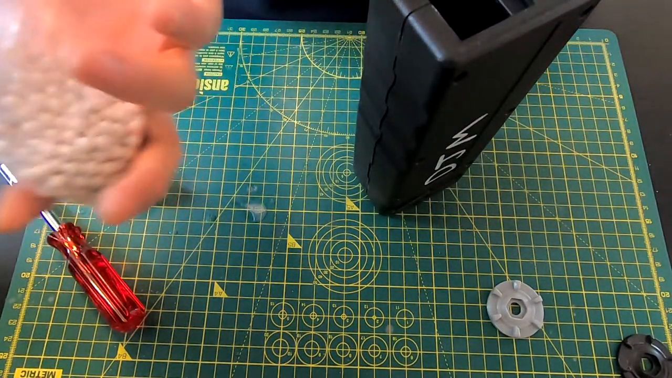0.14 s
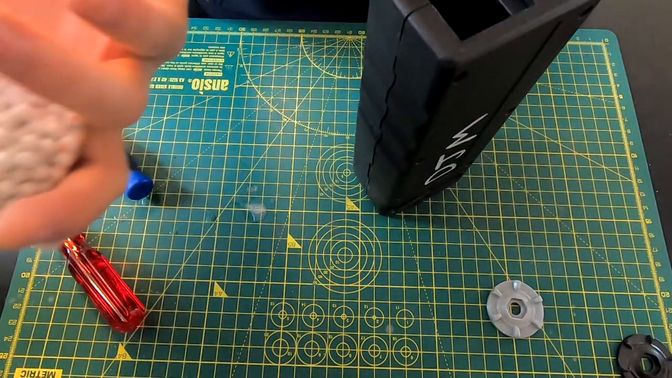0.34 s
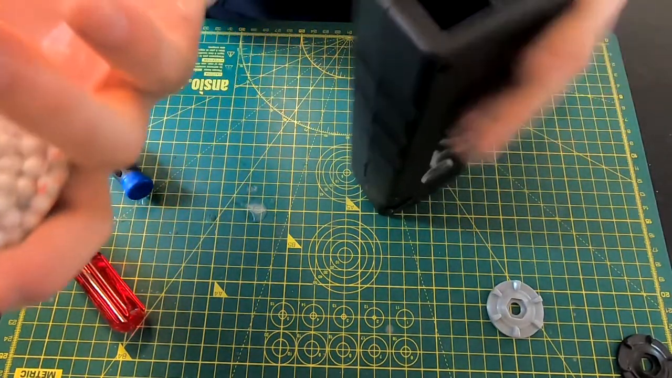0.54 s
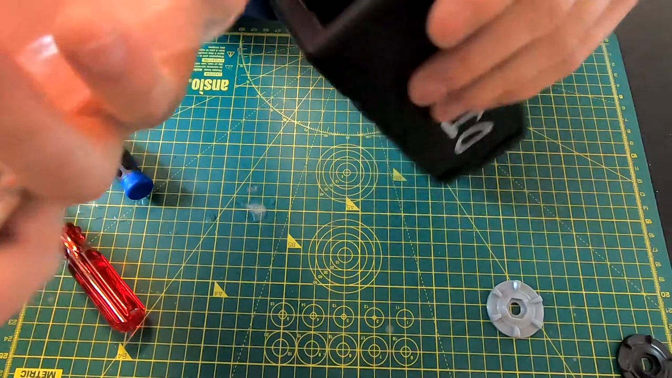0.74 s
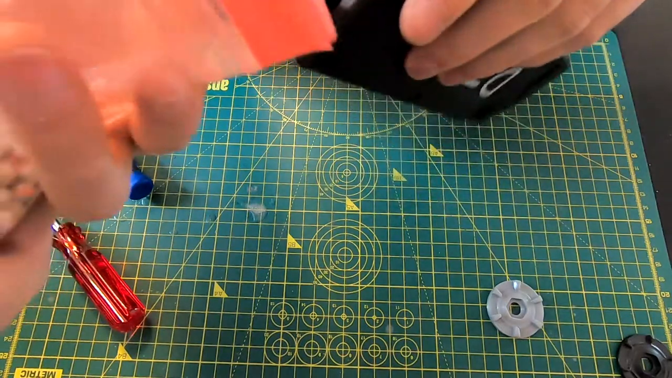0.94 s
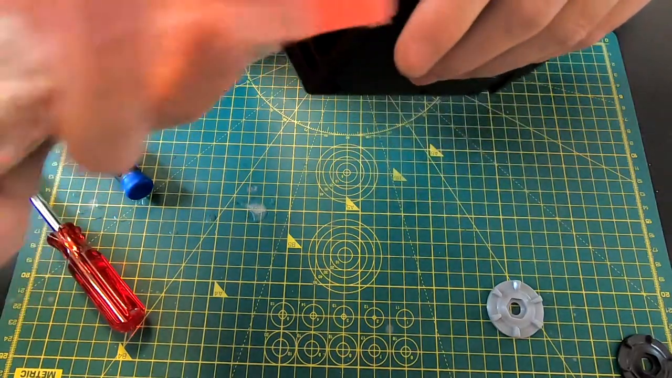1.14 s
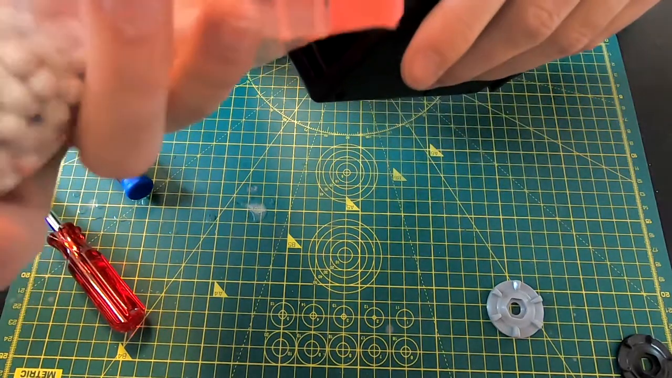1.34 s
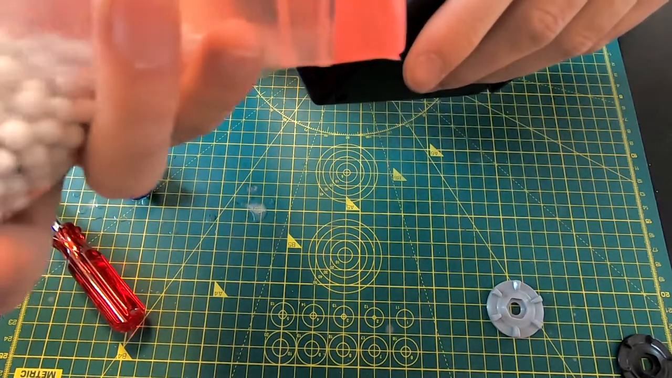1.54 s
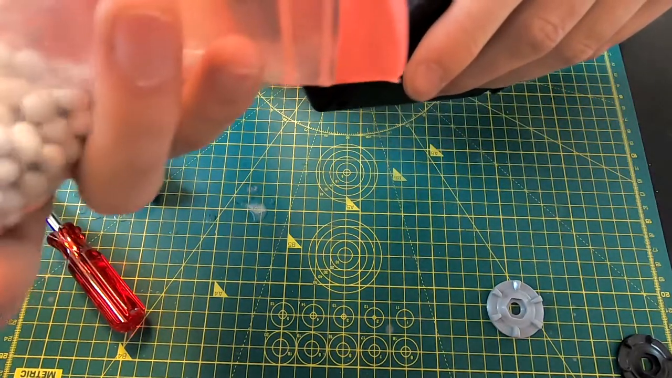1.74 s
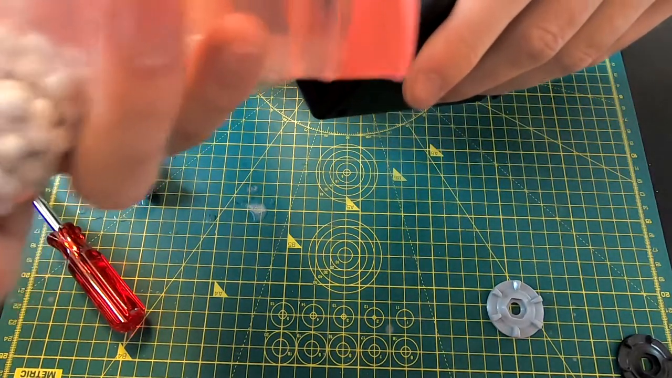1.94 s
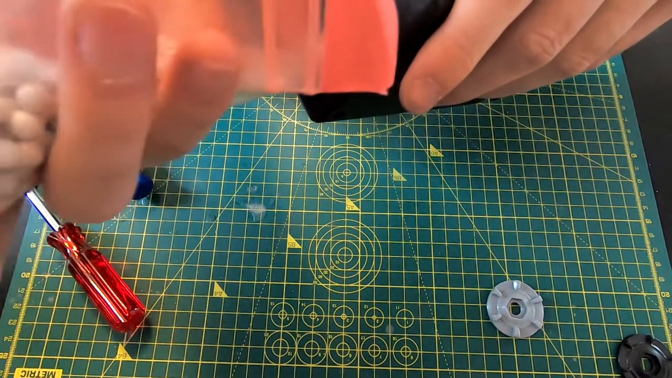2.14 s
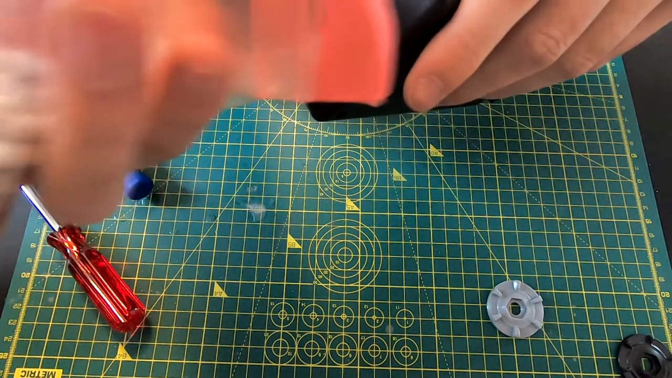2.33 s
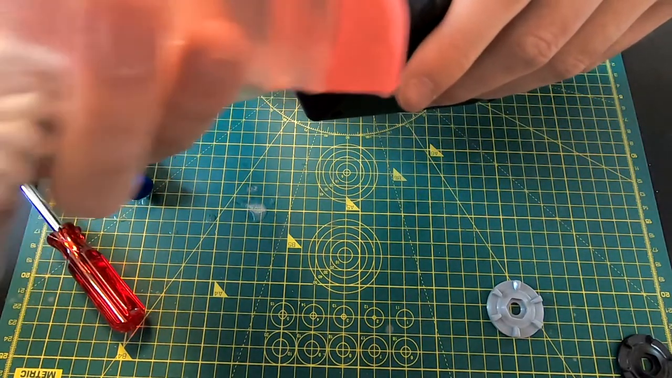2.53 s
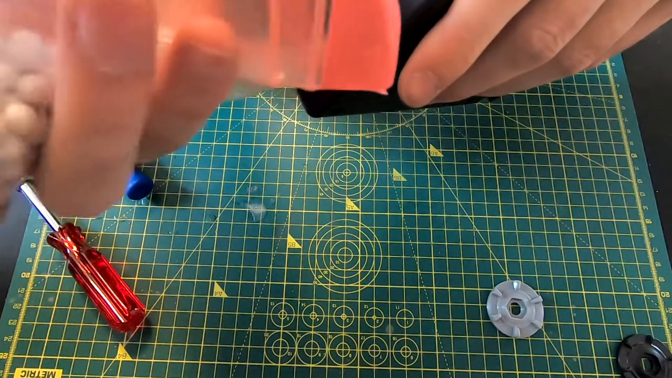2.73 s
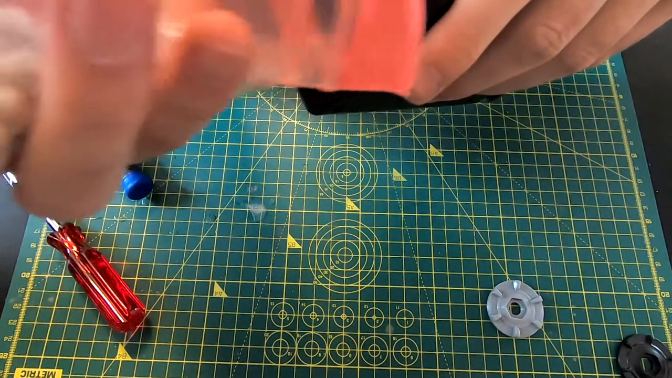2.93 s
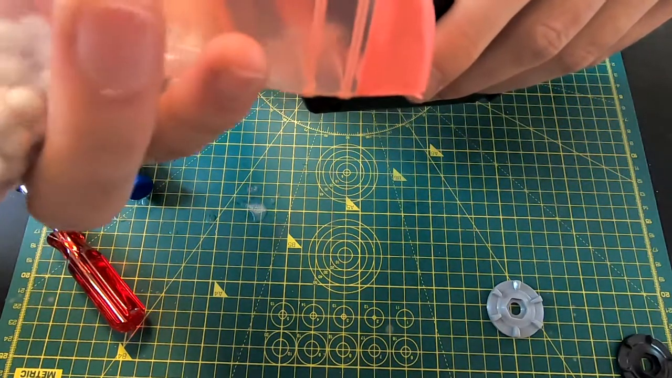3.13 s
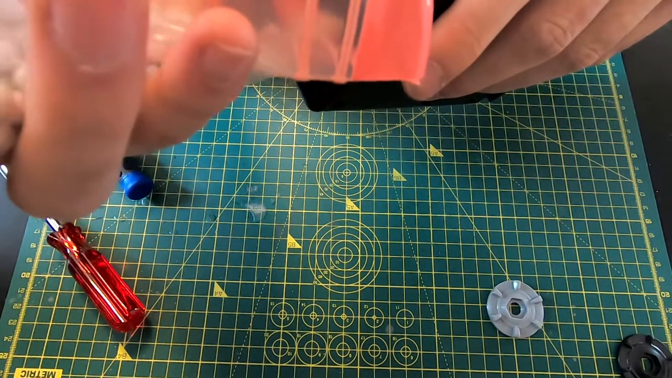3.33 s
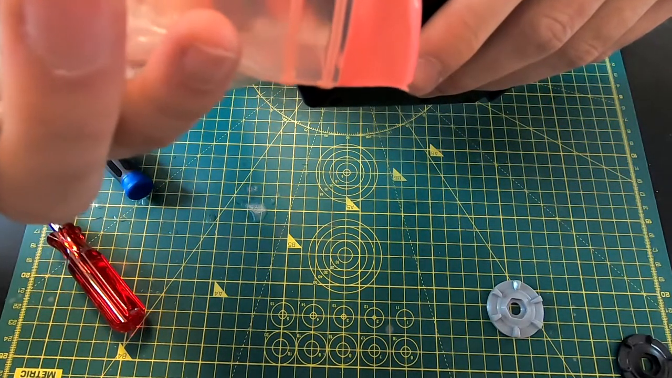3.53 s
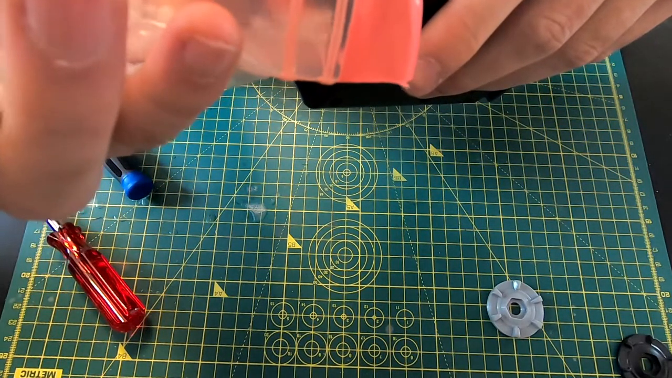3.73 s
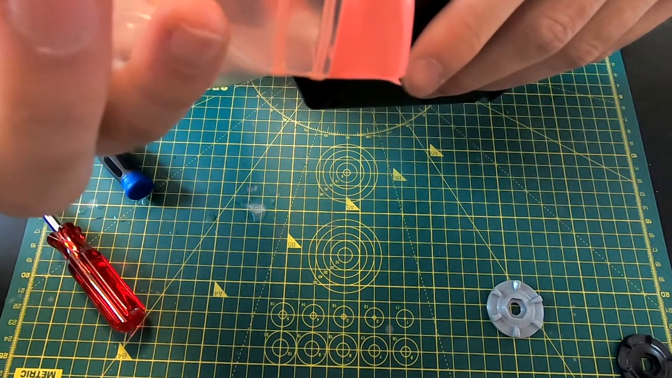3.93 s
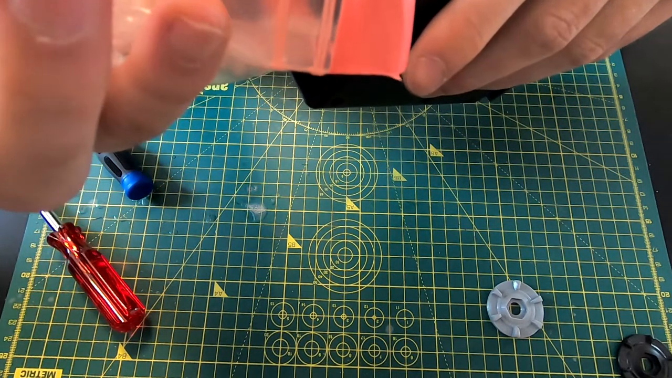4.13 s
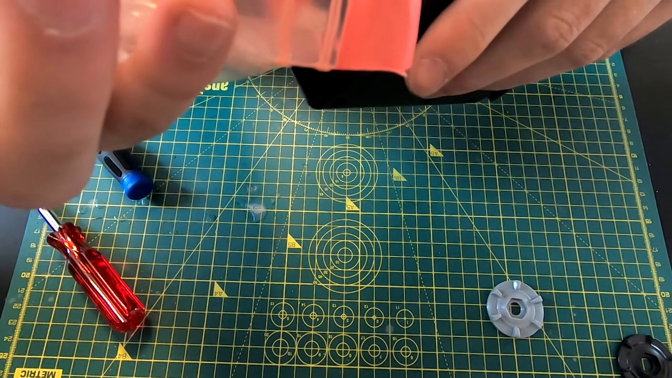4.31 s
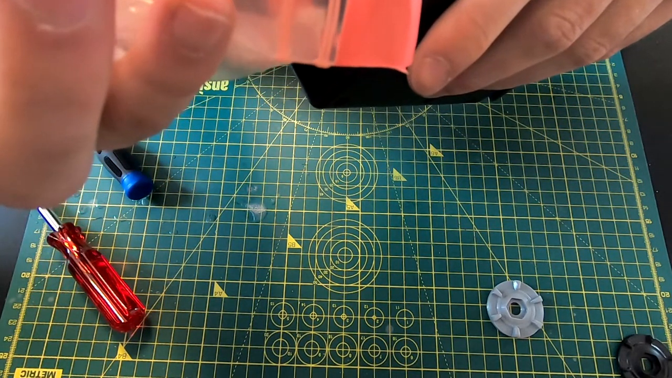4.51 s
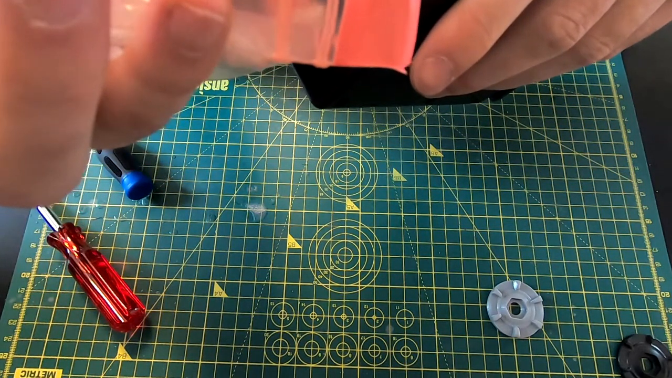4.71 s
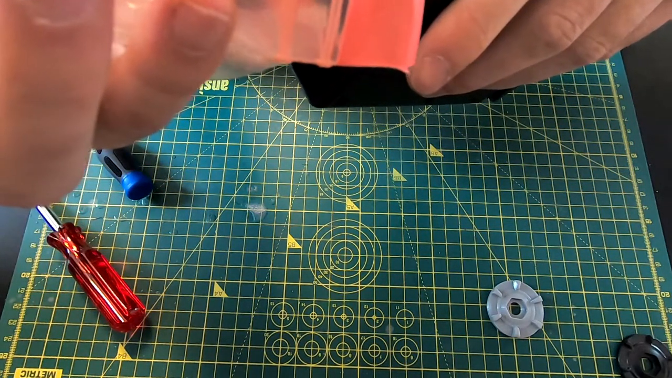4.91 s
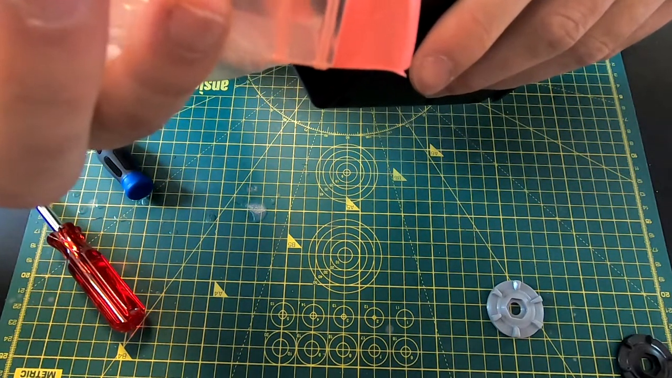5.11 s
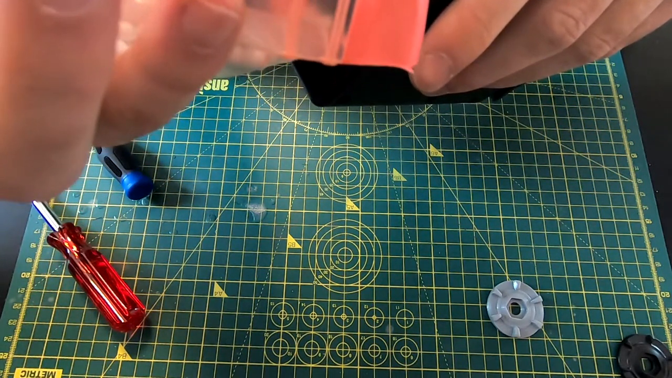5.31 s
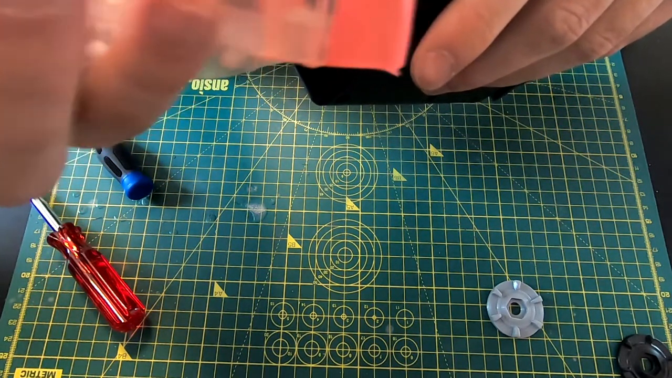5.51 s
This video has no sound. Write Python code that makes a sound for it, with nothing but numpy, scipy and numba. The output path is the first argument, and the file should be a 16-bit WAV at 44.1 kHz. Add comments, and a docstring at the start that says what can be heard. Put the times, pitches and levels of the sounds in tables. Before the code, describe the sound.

After some bag rustling and a few desk knocks, plastic pellets click into a plastic container, building to a bright, continuous rattle.

```python
"""At a desk in a small room, hard plastic pellets are poured from a bag into a hollow plastic hopper.
The bag's film snaps and crinkles, fingers rub it dully, and knocks excite the modes of the desk top,
which also rumbles faintly. Then pellets strike the hopper: singly at first, then as a rattle.
Each impact excites the damped normal modes of the thin walls, whose responses add by superposition."""
import sys
import numpy as np
from scipy import signal
from scipy.fft import rfft, irfft, next_fast_len
from scipy.io import wavfile
from numba import njit

SR = 44100
rng = np.random.default_rng(int(sys.argv[2]) if len(sys.argv) > 2 else 0)


def int16_out(signal):
    """Quantize to a 16-bit WAV file."""
    q = np.round(np.clip(np.atleast_2d(signal).T, -1, 1) * 32767)
    wavfile.write(sys.argv[1], SR, q.astype(np.int16))


N = 249606


def from_db(db):
    """Amplitude ratio of a level in decibels."""
    return 10 ** (np.asarray(db) / 20)


def unit_rms(x):
    """Normalisation to unit mean power."""
    return x / np.sqrt(np.mean(x ** 2) + 1e-20)


def in_time(curve):
    """Linear interpolation of (time_s, value) rows at every sample."""
    return np.interp(np.arange(N) / SR, *np.transpose(curve))


def at_hz(curve, hz):
    """Interpolation of (frequency_hz, value) rows on a logarithmic frequency axis."""
    frequencies, values = np.transpose(curve)
    return np.interp(np.log(hz), np.log(frequencies), values)


def filtered(x, order, edges_hz, kind):
    """Maximally flat filtering."""
    return signal.sosfilt(signal.butter(order, edges_hz, kind, fs=SR, output="sos"), x)


def drift(rate_hz):
    """Slow random fluctuation: low-passed noise of unit rms."""
    step = 40
    pole = np.exp(-2 * np.pi * rate_hz * step / SR)
    slow = signal.lfilter([1], [1, -2 * pole, pole ** 2], rng.standard_normal(N // step + 2002))[2000:]
    return np.interp(np.arange(N) / step, np.arange(len(slow)), unit_rms(slow))


# Likeness of the two channels: frequency_hz, correlation
COHERENCE = [(100, 0.9), (400, 1), (700, 0.53), (1300, 0.65), (2000, 0.59), (2800, 0.94), (5600, 0.41),
             (11000, 0.025)]
# Lean of the sound field: frequency_hz, left_minus_right_db
BALANCE = [(60, -6), (150, 3.5), (380, 4), (950, -2), (2380, 1), (5980, -1), (15000, -3.5)]
def stereo(mid, side, hz):
    """Partial coherence: a common and an opposed part mix into left and right."""
    alike = np.clip(at_hz(COHERENCE, hz), -1, 1)
    lean = from_db(at_hz(BALANCE, hz) * np.array([[.5], [-.5]]))
    return lean * (np.sqrt(1 + alike) * mid + np.sqrt(1 - alike) * side * [[1], [-1]])


def banded_noise(spectrum, white, low_hz, bands, flicker_db):
    """Amplitude modulation: half-octave noise bands flicker, partly together; the sum has unit rms."""
    edges = low_hz * 2 ** (np.arange(bands + 1) / 2)
    out, together = 0, drift(26.6)
    for k, (low, high) in enumerate(zip(edges, edges[1:])):
        mid, side = filtered(white[k % 2], 2, [low, high], "band")
        hz = np.sqrt(low * high)
        level_db = at_hz(spectrum, hz) + flicker_db * (together + 0.87 * drift(53))
        out = out + from_db(level_db) * stereo(mid, side, hz)
    return unit_rms(out)


def ring(clicks, hz, t60):
    """Damped oscillator: a unit impulse starts a decaying sine of unit amplitude."""
    r, w = from_db(-60 / (t60 * SR)), 2 * np.pi * hz / SR
    return signal.lfilter([0, np.sin(w)], [1, -2 * r * np.cos(w), r * r], clicks + 1e-18)


@njit
def add_resonance(out, clicks, a1, a2):
    """Two-pole resonator, summed into out; its frequency varies in time through a1."""
    for c in range(2):
        y1 = y2 = 0.
        for i in range(out.shape[1]):
            y1, y2 = clicks[c, i] + a1[i] * y1 + a2 * y2 + 1e-18, y1
            out[c, i] += y1


LOW_MODE_TOP_HZ = 1420
WANDER_SHARE, WANDER_HZ = .012, 5.5   # grip and fill pull each mode's frequency about
def strike(blows, modes, favour_db, octaves, spread_s, uneven_db, low_coupling=((0, 0), (1, 0))):
    """Modal superposition: blows share their energy among modes, favouring those near their pitch."""
    start_s, level_db, pitch_hz, pan_db = np.transpose(blows)
    mode_hz, mode_db, t60_s = np.transpose(modes)
    low = mode_hz < LOW_MODE_TOP_HZ
    coupling_db = favour_db * np.exp(-.5 * (np.log2(mode_hz / pitch_hz[:, None]) / octaves) ** 2)
    coupling_db += np.outer(np.interp(start_s, *np.transpose(low_coupling)), low)
    scatter_db = uneven_db * np.where(low, .4, 1)   # low modes answer wherever the blow lands
    mid, side, luck = rng.standard_normal((len(blows), len(modes), 3)).transpose(2, 0, 1)
    amplitude = from_db(mode_db + coupling_db + scatter_db * luck)
    amplitude *= (from_db(level_db) / np.sqrt((amplitude ** 2).sum(1)))[:, None]
    delay_s = spread_s * rng.random(amplitude.shape)   # bending waves take a moment to spread
    onset = np.clip(((start_s[:, None] + delay_s) * SR).astype(int), 0, N - 1)
    pulls = [WANDER_SHARE * np.tanh(drift(WANDER_HZ)) for _ in range(5)]
    pan = from_db(np.outer([.5, -.5], pan_db))
    out = np.zeros((2, N))
    for k, (hz, t60) in enumerate(zip(mode_hz, t60_s)):
        r, w = from_db(-60 / (t60 * SR)), 2 * np.pi * hz / SR
        image = stereo(np.sign(mid[:, k]), side[:, k], hz)
        clicks = np.zeros((2, N))
        clicks[:, onset[:, k]] = np.sin(w) * pan * amplitude[:, k] * image
        detuned_cos = np.cos(w) - w * np.sin(w) * pulls[k % len(pulls)]
        add_resonance(out, clicks, 2 * r * detuned_cos, -r * r)
    return out


ROOM_T60_S, ROOM_DB = 0.35, -19
def room(x):
    """Reverberation: six recirculating echoes a side, with absorption rising with frequency."""
    size = next_fast_len(N + SR // 2)
    hz, out = np.arange(size // 2 + 1) * SR / size, []
    for channel in x:
        lags_s = rng.uniform(.007, 0.028, (6, 1))
        loss_db = 60 * lags_s * (1 + hz / 9000) / ROOM_T60_S
        echo = from_db(-loss_db) * np.exp(-2j * np.pi * hz * lags_s)
        response = (echo / (1 - echo)).sum(0)
        out.append(irfft(rfft(channel, size) * response, size)[:N])
    return np.array(out)


# Desk vibration under hands and pouring: time_s, level_db
RUMBLE_LEVEL = [(0.0, -81), (1.25, -75), (1.4, -78), (2.95, -64.5), (3.5, -60.5), (4.49, -64),
                (4.75, -56.5), (5.31, -67), (5.66, -64)]
def desk_rumble():
    """Structure-borne noise: a faint, lumpy bass, partly coherent between the channels."""
    mid, side = filtered(rng.standard_normal((2, N)), 3, [55, 150], "band")
    envelope = from_db(in_time(RUMBLE_LEVEL) + 3.9 * drift(9.5))
    return envelope * unit_rms(mid + 0.49 * side * [[1], [-1]])


# Modes of the desk top: frequency_hz, level_db, t60_s
DESK_MODES = [(80.6, 5.5, 0.33), (125, -3.5, 0.39), (296, -11.5, 0.05), (746, -20, 0.027),
              (1030, -13, 0.057), (1190, -4, 0.018), (1270, -11, 0.048)]
# Knocks on the desk: start_s, level_db, low_mode_gain_db
DESK_KNOCKS = [(0.602, -35, 10.5), (0.611, -33, -3), (.779, -42, -33), (0.834, -22, -38), (1.26, -27, -28)]
HAND_SETTLES_S, HAND_DAMPING_DB = .705, -14
def desk_knocks():
    """Free vibration: the top booms until a hand damps it; later knocks ring mainly the upper modes."""
    damping = from_db(in_time([(HAND_SETTLES_S, 0), (HAND_SETTLES_S + 0.0072, HAND_DAMPING_DB)]))
    out = np.zeros(N)
    for k, (hz, mode_db, t60) in enumerate(DESK_MODES):
        clicks, low = np.zeros(N), hz < 200
        for start_s, level_db, low_db in DESK_KNOCKS:
            clicks[round(start_s * SR)] = -from_db(level_db + mode_db + low * low_db)
        out += ring(clicks, hz, t60) * (damping if low else (-1) ** k)
    return out * from_db([[-.8], [.8]])


# Fingers shifting their grip: peak_s, level_db
GRIP_THUDS = [(0.394, -50), (.49, -54), (0.597, -37), (1.259, -32.5), (1.484, -31), (1.53, -45),
              (1.61, -39), (2.034, -42), (2.158, -43), (2.284, -41), (2.475, -36), (2.517, -37),
              (2.628, -44), (3.076, -37), (3.145, -46), (3.235, -41), (3.501, -41), (4.215, -43),
              (4.57, -38), (5.01, -41), (5.46, -42)]
GRIP_ATTACK_S, GRIP_RELEASE_S = 0.0059, 0.0084
def grip_envelope():
    """Exponential growth and decay of each dull thud."""
    out, t = np.zeros(N), np.arange(N) / SR
    for peak_s, level_db in GRIP_THUDS:
        falloff = np.maximum((peak_s - t) / GRIP_ATTACK_S, (t - peak_s) / GRIP_RELEASE_S)
        out += from_db(level_db) * np.exp(-falloff)
    return out


# Fingers rubbing the bag: time_s, level_db
RUB_LEVEL = [(0, -48.5), (.3, -60), (.5, -79), (.62, -46.5), (.88, -69), (1.2, -61), (1.29, -42),
             (1.44, -48.5), (1.55, -42), (1.8, -48), (2.04, -43.5), (2.09, -56), (2.17, -38.5), (2.25, -56),
             (2.33, -42.5), (2.43, -52), (2.55, -45.5), (2.88, -49), (2.96, -56), (3.02, -52),
             (3.18, -41.5), (4.0, -48), (4.98, -48), (5.66, -55)]
# Spectrum of the rubbing: frequency_hz, relative_density_db
RUB_SPECTRUM = [(41, -41), (70, -18), (204, 1.5), (350, -3), (538, -2.5), (584, 4), (718, 0.5),
                (1100, -3.5), (1430, -33), (2420, -120)]
def bag_rubbing():
    """Friction noise: the fingers and the mass of pellets shifting with the flow add in power."""
    fingers = from_db(in_time(RUB_LEVEL)) + grip_envelope()
    shifting = from_db(in_time(POUR_LEVEL) - 29)
    white = rng.standard_normal((2, 2, N))
    friction = banded_noise(RUB_SPECTRUM, white, low_hz=81.1, bands=8, flicker_db=2.2)
    return np.hypot(fingers, shifting) * friction


# Fine crinkle of the film: time_s, level_db
CRINKLE_LEVEL = [(0, -35.5), (.07, -41), (.17, -43.5), (.3, -56), (.38, -55), (.455, -71), (.49, -43),
                 (.525, -74), (.57, -49), (.6, -47), (.72, -44), (.88, -48), (1.0, -48), (1.1, -43.5),
                 (1.2, -44), (1.28, -31.5), (1.43, -40.5), (1.55, -36.5), (1.7, -42), (1.81, -42),
                 (1.92, -48), (2.0, -41), (2.085, -48), (2.15, -31.5), (2.195, -41), (2.24, -38),
                 (2.4, -40.5)]
# Spectrum of the crinkle: frequency_hz, relative_density_db
CRINKLE_SPECTRUM = [(290, -20), (500, -15), (595, -14.5), (729, -12.5), (906, -12.5), (1190, -4.5),
                    (1460, -6), (3810, -9), (7000, -14.5), (10100, -29.5), (16000, -138)]
CREASES_PER_S, BAG_LEFT_DB = 1500, 3   # the bag is held to the left
def bag_crinkle():
    """Shot noise: fine creases add random impulses to a hiss."""
    sizes = from_db(5.0 * np.minimum(rng.exponential(1, N), 2.5))
    creases = rng.standard_normal((2, 2, N)) * (0.91 + (rng.random(N) < CREASES_PER_S / SR) * sizes)
    crinkle = banded_noise(CRINKLE_SPECTRUM, creases, low_hz=465, bands=10, flicker_db=2.58)
    pan = from_db(BAG_LEFT_DB * np.array([[.5], [-.5]]))
    return from_db(in_time(CRINKLE_LEVEL)) * crinkle * pan


# Strength of the film's modes: frequency_hz, level_db
FILM_SPECTRUM = [(300, -25.5), (700, -18.5), (1370, -7.5), (2020, -7), (2890, -0.5), (3680, -4), (4330, -2),
                 (5980, 0.5), (7030, -9), (11000, -17)]
# Faint modes of the packed bag: frequency_hz, level_db, t60_s
BAG_MODES = [(750, -10, 0.082), (1275, -21, 0.11), (2260, -16, 0.072)]
# Loudest snaps of the film: start_s, level_db, pitch_hz
FILM_SNAPS = [(0.0263, -20.5, 2550), (0.0423, -17, 2680), (0.0673, -26, 3550), (0.1183, -23, 2400),
              (0.2075, -32, 1490), (0.2167, -19.5, 1770), (0.229, -26, 4020), (0.2438, -23.5, 1350),
              (0.263, -39, 5170), (0.2815, -56, 4000), (0.2906, -21.5, 2460), (0.2992, -24, 5140),
              (0.328, -26.5, 920), (0.3475, -37, 5500), (0.3658, -50, 6000), (0.3918, -26.5, 1190),
              (0.473, -40, 1160), (0.4844, -31, 1990), (0.5325, -47, 5000), (0.549, -33, 5500),
              (0.588, -27, 1000), (0.6094, -22.5, 700), (0.7035, -26.5, 1280), (0.7786, -25, 1760),
              (0.8334, -18.5, 1160), (1.0255, -37, 2290), (1.1278, -29.5, 1700), (1.208, -27, 1330),
              (1.2232, -30, 2290), (1.238, -30, 2150), (1.2606, -20, 3700), (1.2756, -18, 1580),
              (1.471, -23, 5400), (1.4802, -10.5, 2980), (1.4963, -24, 2440), (1.5243, -9.5, 4770),
              (1.5704, -26, 1510), (1.5794, -13, 2620), (1.6037, -17, 2700), (1.613, -13.5, 1280),
              (1.6378, -18, 1000), (1.8269, -16, 1740)]
FILM_T60_CYCLES = 16
def bag_snaps():
    """Impulse response: heavily damped film modes die in a few cycles; the packed bag rings on."""
    film = [(hz, at_hz(FILM_SPECTRUM, hz), FILM_T60_CYCLES / hz) for hz in np.geomspace(300, 11000, 40)]
    blows = np.c_[FILM_SNAPS, np.full(len(FILM_SNAPS), BAG_LEFT_DB)]
    snaps = strike(blows, film + BAG_MODES, favour_db=10.5, octaves=0.2, spread_s=.0009, uneven_db=3.5)
    return filtered(snaps, 3, [260, 9000], "band")   # too small for bass, too soft for a bright edge


# Crowd of minor wall modes: frequency_hz, level_db
WALL_SPECTRUM = [(590, -48), (1000, -18), (1120, -19), (1290, -9), (1470, -9), (1980, -5), (2590, -11.5),
                 (3300, -10.5), (4200, -8), (4750, -14.5), (5200, -12.5), (6630, -8.5), (7700, -7.5),
                 (7900, -12), (8300, -8.5), (8950, -12), (9250, -16.5), (9900, -13), (13100, -36.5),
                 (16000, -38)]
# Decay of the minor modes: frequency_hz, t60_s
WALL_DECAY = [(1200, 0.039), (3500, 0.1), (8000, 0.059), (15000, 0.15)]
# Prominent wall modes: frequency_hz, bandwidth_hz, level_db
CLEAR_MODES = [(1304, 39, 8.5), (1364, 17, -3), (1890, 35, -10), (2044, 40, 1.5), (2440, 51, -5.5),
               (2890, 120, 2.5), (2620, 230, -6.5), (3340, 520, 6.5), (3404, 200, 4.5), (3700, 480, -1),
               (3766, 87, -0.5), (4195, 79, 0.5), (4520, 84, -2), (5143, 88, 1), (5550, 50, 2.5),
               (5830, 48, 3), (6500, 280, 7), (8070, 220, 0.5)]
CRACK_BOOST_DB, CRACK_T60_S = 7.5, 0.018
def hopper_modes():
    """Thin plates have constant modal density: an even crowd of modes, with a few standing out."""
    crowd_hz = np.linspace(1480, 15700, 150) + 45 * rng.uniform(-1.07, 1, 150)
    damped = np.arange(len(crowd_hz)) % 3 == 1   # heavily damped modes give each blow its crack
    level_db = at_hz(WALL_SPECTRUM, crowd_hz) + CRACK_BOOST_DB * damped
    t60_s = np.where(damped, CRACK_T60_S, at_hz(WALL_DECAY, crowd_hz))
    clear = [(hz, db + 10 * np.log10(width / 110), np.log(1000) / np.pi / width)
             for hz, width, db in CLEAR_MODES]
    return list(zip(crowd_hz, level_db, t60_s)) + clear


# Stream of smaller blows: time_s, level_db
POUR_LEVEL = [(1.9, -50.5), (2.14, -39), (2.25, -36), (2.33, -28), (2.395, -33), (2.43, -27), (2.55, -24),
              (2.8, -24), (2.9, -23.5), (2.955, -38), (2.97, -20.5), (3.0, -25.5), (3.1, -25.5),
              (3.15, -27.5), (3.24, -25), (3.43, -20), (3.455, -31), (3.48, -23), (3.9, -19), (4.5, -19),
              (5.15, -19), (5.2, -24), (5.27, -23), (5.37, -26), (5.41, -22), (5.66, -22.5)]
FULL_FLOW_PER_S, RATE_EXPONENT = 750, .4   # a thinner flow strikes less often
def pellet_stream():
    """Random point process: pellets slide out in clumps, giving many weak blows and a few strong."""
    flow_db = in_time(POUR_LEVEL)
    clumping_db = 1.5 * drift(18)
    per_s = FULL_FLOW_PER_S * from_db(RATE_EXPONENT * (flow_db - flow_db.max()) + clumping_db)
    onset = np.flatnonzero(rng.random(N) < per_s / SR)
    level_db = flow_db[onset] - 10 * np.log10(per_s[onset] / 100)   # the blows share the flow's power
    level_db += 2.3 * np.minimum(rng.exponential(1, len(onset)), 3)
    pitch_hz = 2280 * (8400 / 2280) ** rng.random(len(onset))
    pan_db = rng.normal(0, 1.0, len(onset))
    blows = np.c_[onset / SR, level_db, pitch_hz, pan_db]
    return blows[onset / SR > POUR_LEVEL[0][0]]


REBOUND_DELAY_S, REBOUND_LOSS_DB = (.003, .009), (6, 16)
def rebounds(blows):
    """Inelastic collision: each pellet glances off and strikes another spot more weakly."""
    start_s, level_db, pitch_hz, pan_db = blows.T
    delay, loss, spot = rng.random((len(blows), 3)).T
    delay_s = np.interp(delay, [0, 1], REBOUND_DELAY_S)
    loss_db = np.interp(loss, [0, 1], REBOUND_LOSS_DB)
    return np.c_[start_s + delay_s, level_db - loss_db, pitch_hz * (.5 + spot), pan_db]


# Coupling to the low, hollow wall modes as grip and fill change: time_s, gain_db
HOLLOW_COUPLING = [(1.7, 0), (2.0, -5), (2.1, 3), (2.5, 2.5), (2.6, 4), (3.03, 3), (3.1, -17), (3.2, 5.5),
                   (3.25, 5.5), (4.0, 3), (4.6, 3.5), (5.15, 3), (5.2, -4), (5.66, 1)]
# Loudest pellets, with the pitch that the struck spot favours: start_s, level_db, pitch_hz
PELLET_IMPACTS = [(1.7264, -16.5, 3840), (1.7401, -13, 8500), (1.7435, -26, 1990), (1.8347, -15, 7550),
                  (1.8415, -14.5, 4440), (1.8615, -40, 2760), (1.8764, -19, 7700), (1.8973, -24.5, 2330),
                  (1.9277, -27, 7360), (1.9361, -20.5, 2760), (1.9425, -42, 2600), (1.9475, -36, 2600),
                  (1.9669, -25.5, 1670), (2.0069, -29, 2630), (2.0148, -25, 2760), (2.0317, -15.5, 2830),
                  (2.0405, -23, 7320), (2.0576, -10.5, 3470), (2.0954, -11.5, 6400), (2.1205, -12, 1390),
                  (2.1356, -24, 9600), (2.1486, -18, 2430), (2.1643, -24, 5080), (2.1822, -26, 2500),
                  (2.2063, -8.5, 3140), (2.2534, -8, 3050), (2.2796, -11, 3030), (2.3103, -13.5, 3490),
                  (2.3252, -15, 7240), (2.3356, -12.5, 6630), (2.357, -15, 7400), (2.3644, -11, 3230),
                  (2.3739, -14.5, 6500), (2.4066, -13, 2950), (2.4208, -10, 3170), (2.4471, -16, 2130),
                  (2.4529, -15, 1770), (2.4653, -11, 3500), (2.4911, -11.5, 3550), (2.5007, -16.5, 4740),
                  (2.5324, -15.5, 6500), (2.5525, -14, 5120), (2.5663, -10.5, 3150), (2.5785, -15.5, 4000),
                  (2.598, -13, 6650), (2.6093, -12.5, 5170), (2.6223, -22, 5300), (2.6425, -10.5, 3230),
                  (2.6559, -13.5, 1440), (2.6696, -17, 6720), (2.68, -17, 4730), (2.6879, -13.5, 7240),
                  (2.7201, -14.5, 2710), (2.7274, -12, 2960), (2.7519, -18, 2070), (2.7696, -16, 4700),
                  (2.785, -28, 4240), (2.7938, -27, 2020), (2.8078, -9.5, 3320), (2.825, -14.5, 2520),
                  (2.8363, -15.5, 4830), (2.8478, -41, 9990), (2.861, -19, 7450), (2.8905, -10.5, 3600),
                  (2.9172, -17.5, 6700), (2.9334, -13, 6200), (2.9778, -12.5, 3450), (2.9851, -15, 6420),
                  (2.9994, -18, 5120), (3.0055, -11, 7350), (3.0109, -29, 3360), (3.0315, -18.5, 4520),
                  (3.0396, -17.5, 8480), (3.0624, -15.5, 4520), (3.072, -20, 3490), (3.0833, -11.5, 3500),
                  (3.0909, -19, 5730), (3.122, -15.5, 4460), (3.1602, -12, 2040), (3.1696, -14, 5350),
                  (3.1982, -13, 3340), (3.236, -16.5, 6680), (3.2438, -9.5, 3360), (3.2693, -12.5, 3450),
                  (3.3115, -12.5, 3470), (3.3249, -17, 5200), (3.3458, -16, 5080), (3.3614, -12, 1440),
                  (3.3695, -20, 1480), (3.3934, -25, 2240), (3.4076, -16, 1850), (3.4141, -12.5, 1940),
                  (3.423, -14, 3400), (3.4332, -17.5, 7600), (3.4777, -13, 2410), (3.4896, -11.5, 3360),
                  (3.4976, -28, 3320), (3.5089, -15.5, 5140), (3.5224, -12, 1950), (3.5378, -13, 3420),
                  (3.5762, -13, 3700), (3.5892, -15, 3140), (3.5991, -13.5, 7490), (3.6131, -19, 5680),
                  (3.6305, -11, 4480), (3.6415, -25, 4220), (3.6659, -27, 3360), (3.677, -16, 3450),
                  (3.6879, -12.5, 7970), (3.7005, -14, 6460), (3.7154, -29, 5080), (3.725, -17, 3700),
                  (3.741, -13, 7100), (3.7531, -13.5, 1430), (3.7644, -23, 2280), (3.772, -16.5, 4130),
                  (3.7826, -13.5, 2650), (3.8247, -11.5, 3380), (3.8336, -11.5, 1770), (3.8599, -9.5, 6600),
                  (3.8757, -16.5, 1510), (3.8978, -12, 7490), (3.9339, -14, 2280), (3.9454, -16, 5120),
                  (3.9533, -14, 3360), (3.9663, -14, 3400), (3.9832, -14.5, 7540), (3.9937, -21, 2020),
                  (4.0034, -18, 6550), (4.0229, -12.5, 3300), (4.0452, -13, 2020), (4.051, -24, 3490),
                  (4.0828, -11.5, 1980), (4.1307, -12, 1780), (4.1481, -14, 8440), (4.1576, -18, 8830),
                  (4.1671, -17, 2820), (4.1838, -16, 3790), (4.1938, -17, 2240), (4.2163, -13, 3630),
                  (4.2296, -11.5, 1450), (4.2455, -15, 5860), (4.255, -19, 8030), (4.271, -13, 6520),
                  (4.3006, -11.5, 6330), (4.3203, -14.5, 7300), (4.3607, -11.5, 3470),
                  (4.3753, -11.5, 3570), (4.3909, -11, 2580), (4.4062, -12.5, 2330), (4.4264, -11, 1940),
                  (4.4542, -14, 7020), (4.466, -12, 3800), (4.484, -31, 3320), (4.4945, -13.5, 3980),
                  (4.5183, -17, 6500), (4.5472, -12, 8700), (4.5607, -24, 3400), (4.5817, -13.5, 6300),
                  (4.5988, -11, 3190), (4.6088, -12, 3830), (4.616, -17, 6240), (4.6488, -12.5, 4450),
                  (4.6817, -18, 4130), (4.6952, -17, 2800), (4.7083, -13.5, 8440), (4.7194, -24, 2840),
                  (4.7387, -13, 3900), (4.7619, -17, 3360), (4.779, -12.5, 3030), (4.79, -13, 5900),
                  (4.8078, -17.5, 1890), (4.8194, -10.5, 5700), (4.8271, -20, 5900), (4.836, -23, 2760),
                  (4.8515, -15.5, 3660), (4.8687, -17, 2800), (4.8787, -15, 6840), (4.8949, -15, 3450),
                  (4.9218, -25, 5680), (4.9307, -12.5, 5660), (4.9579, -12, 4300), (4.9883, -13, 1770),
                  (5.0213, -12, 5570), (5.038, -12.5, 3530), (5.0535, -14.5, 6260), (5.0687, -13, 2900),
                  (5.1011, -13, 3830), (5.1085, -14.5, 8870), (5.1166, -17, 6700), (5.1239, -12, 3490),
                  (5.1381, -20, 3920), (5.1466, -15, 5640), (5.1654, -14, 3640), (5.182, -12.5, 5200),
                  (5.2159, -12.5, 6330), (5.2252, -17, 6630), (5.234, -18, 5990), (5.2531, -15, 4010),
                  (5.2662, -16.5, 4090), (5.2825, -14.5, 3790), (5.2962, -13.5, 3570), (5.3076, -22, 4180),
                  (5.3304, -14, 3400), (5.3632, -14.5, 2800), (5.4163, -12, 3770), (5.4231, -16, 5760),
                  (5.4481, -31, 3530), (5.4735, -13, 2860), (5.4954, -19, 2890), (5.506, -14, 6120),
                  (5.5152, -28, 6070), (5.5393, -19, 3660), (5.5465, -17.5, 3960), (5.5572, -21, 2820),
                  (5.5664, -17, 5600), (5.5744, -21, 2700), (5.593, -17.5, 6030), (5.599, -18.5, 2710),
                  (5.6104, -12, 3640), (5.6254, -13, 3000), (5.6422, -23, 3470)]
def pellets_in_hopper():
    """Impact excitation: pellets ring the hopper's walls; so small a box radiates no bass."""
    modes, stream = hopper_modes(), pellet_stream()
    pan_db = -0.5 * rng.standard_normal(len(PELLET_IMPACTS))
    loudest = np.c_[PELLET_IMPACTS, pan_db]
    blows = np.r_[loudest, rebounds(loudest), stream]
    walls = strike(blows, modes, favour_db=7, octaves=0.14, spread_s=.0019, uneven_db=4.0,
                   low_coupling=HOLLOW_COUPLING)
    return filtered(walls, 8, 1210, "high")


def scene():
    """Airborne sound reverberates in the room; the desk's reaches the microphone through its stand."""
    airborne = pellets_in_hopper() + bag_snaps() + bag_crinkle() + bag_rubbing()
    return airborne + from_db(ROOM_DB) * room(airborne) + desk_knocks() + desk_rumble()


def record(dry):
    """Soft saturation rounds the peaks; band limiting removes the deep bass and the highest treble."""
    ceiling, stopband_hz = .5, 16300
    rounded = dry / (1 + (dry / ceiling) ** 4) ** .25
    thinned = filtered(rounded, 3, 42, "high")
    return signal.sosfilt(signal.cheby2(12, 60, stopband_hz, fs=SR, output="sos"), thinned)


dry = scene()
out = record(dry)
int16_out(out)
```